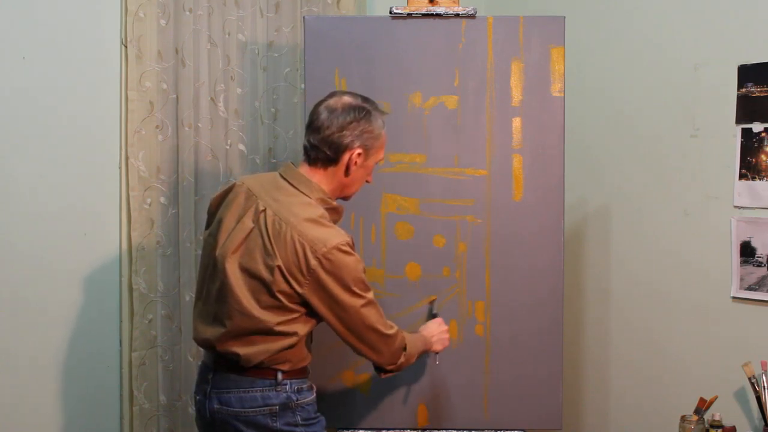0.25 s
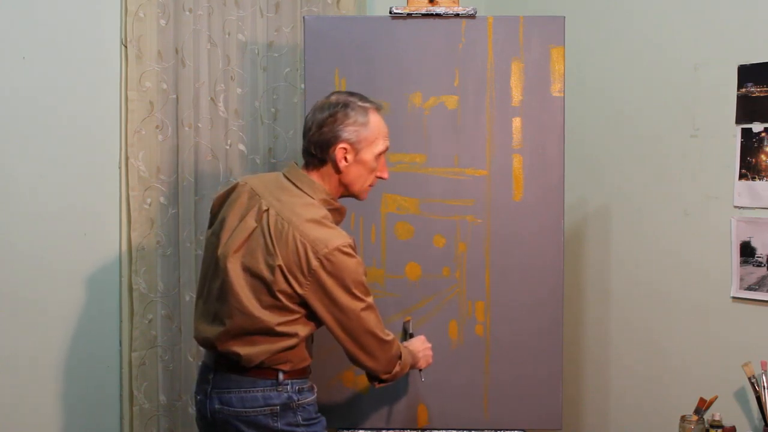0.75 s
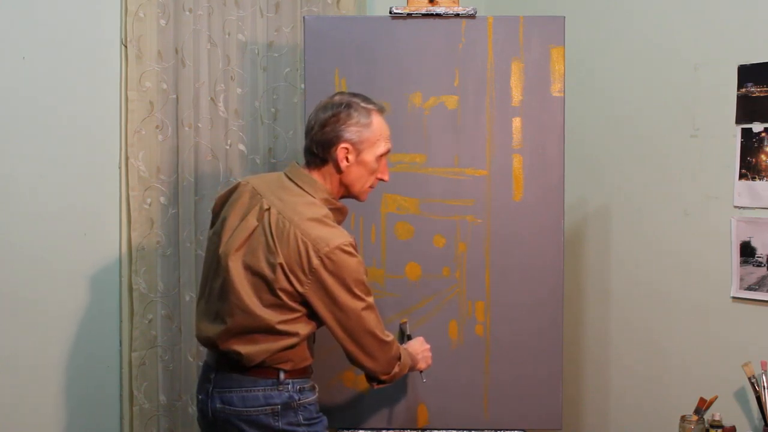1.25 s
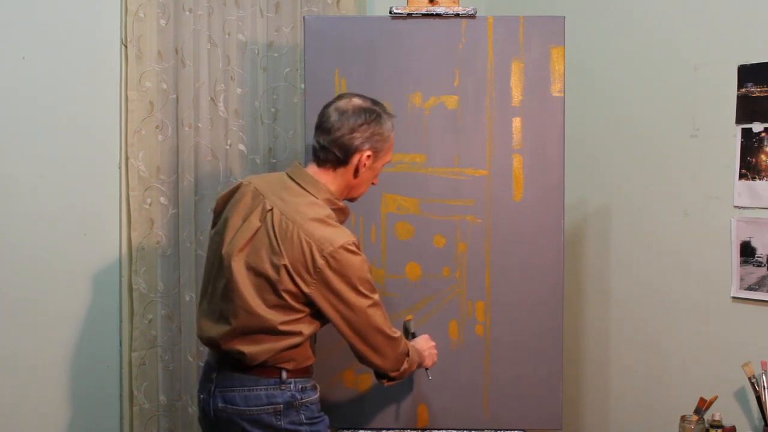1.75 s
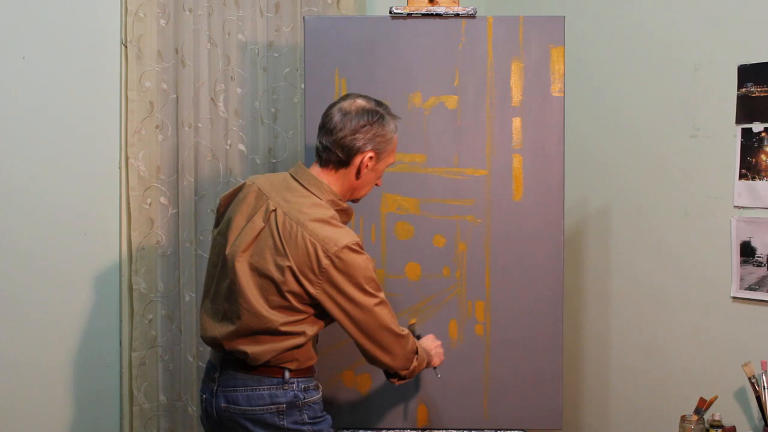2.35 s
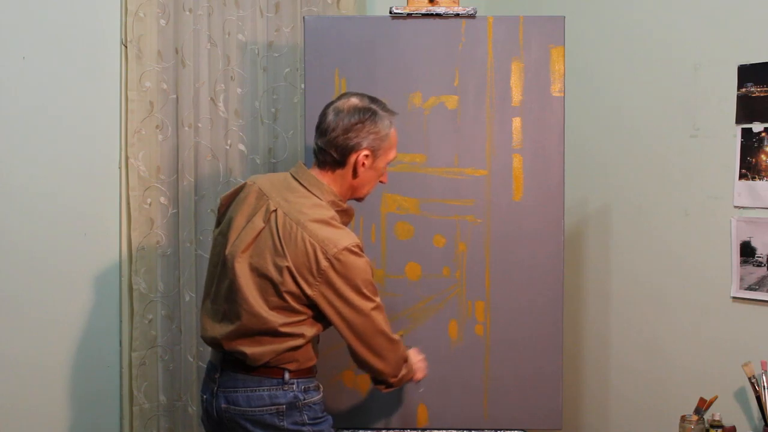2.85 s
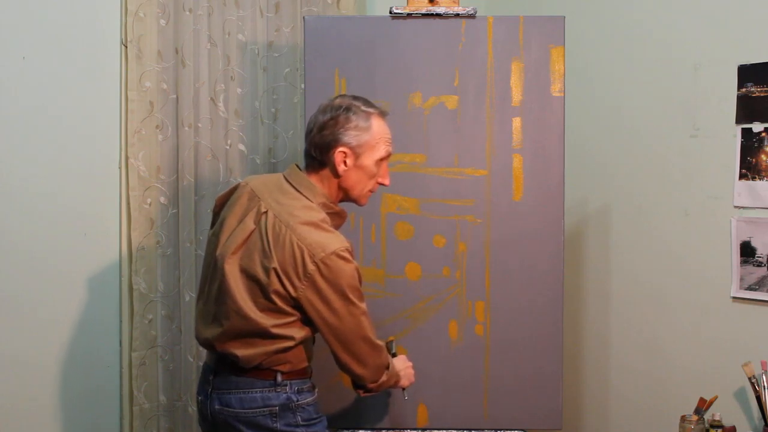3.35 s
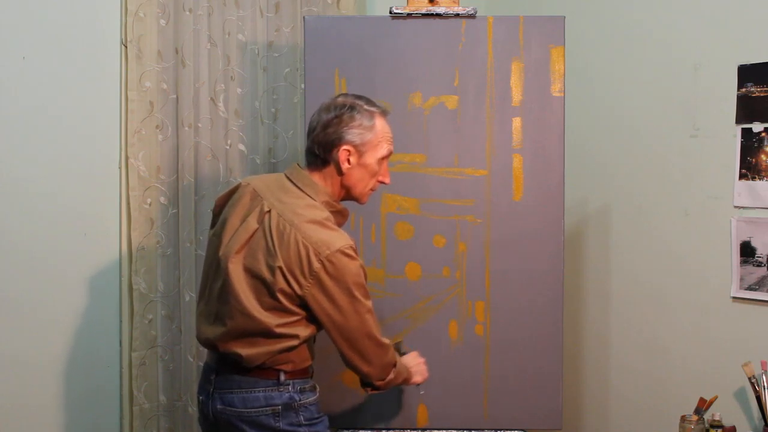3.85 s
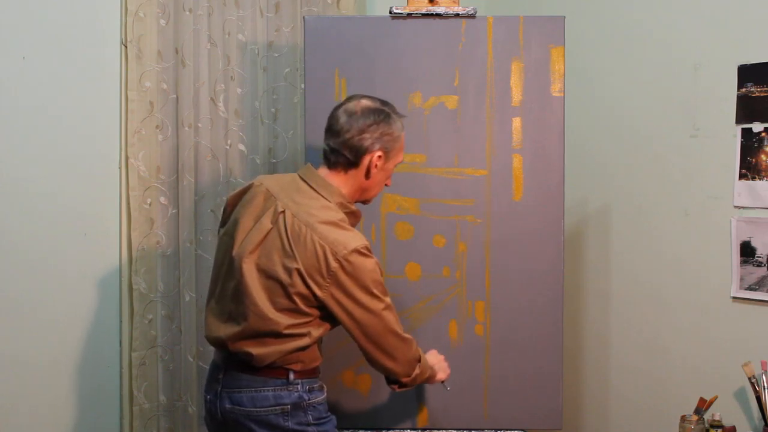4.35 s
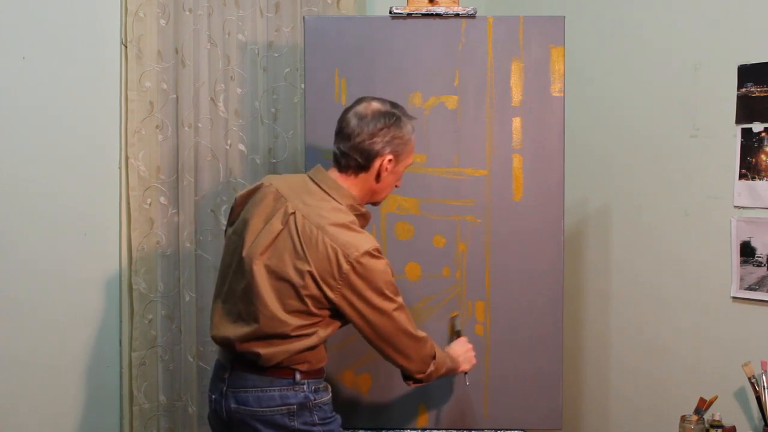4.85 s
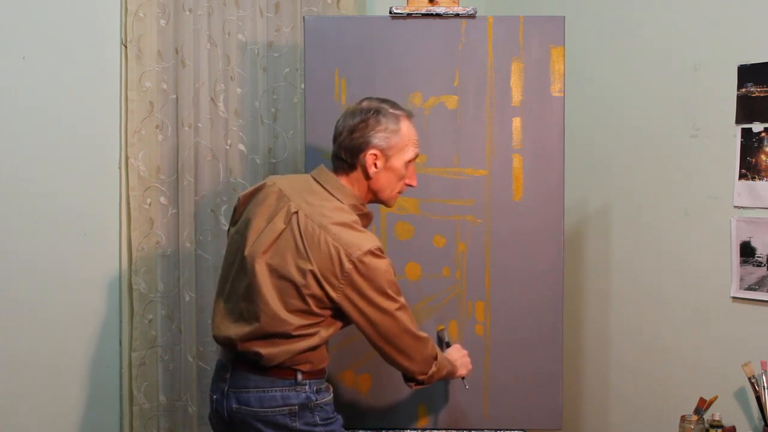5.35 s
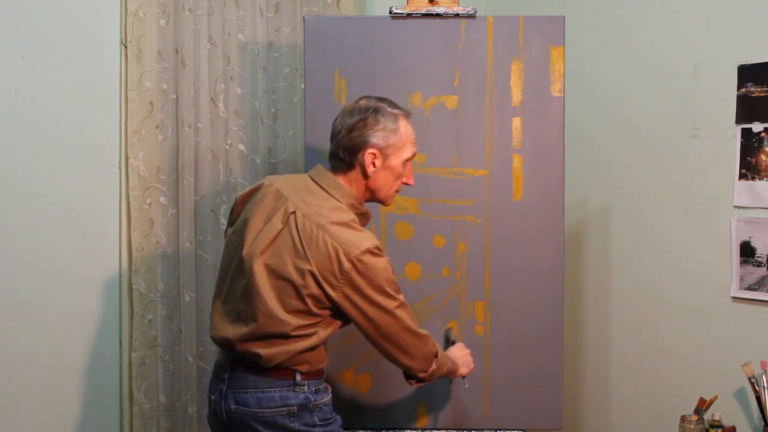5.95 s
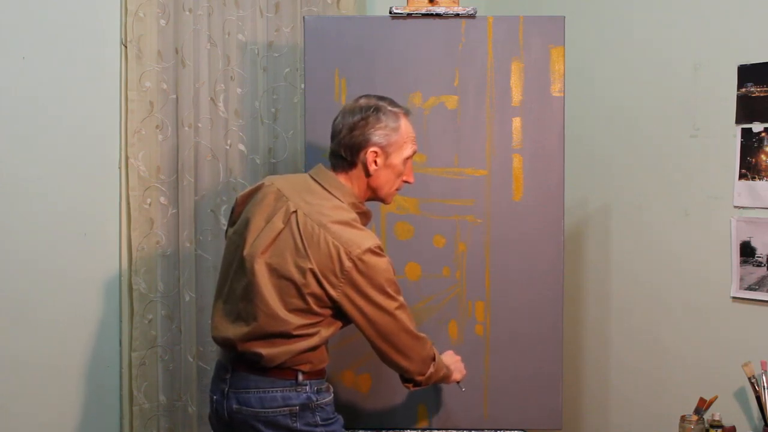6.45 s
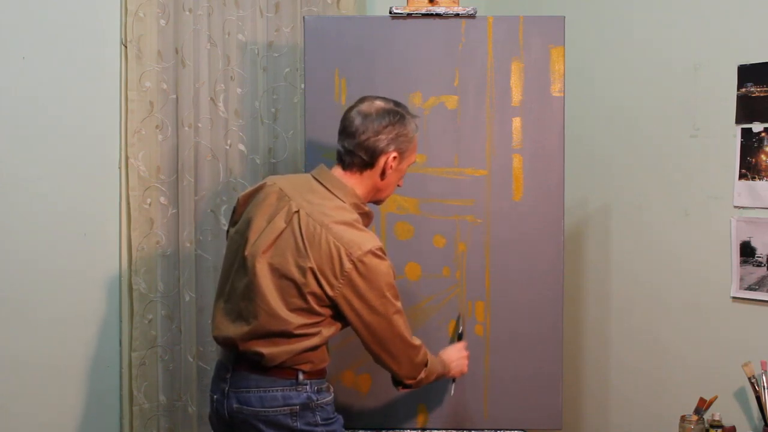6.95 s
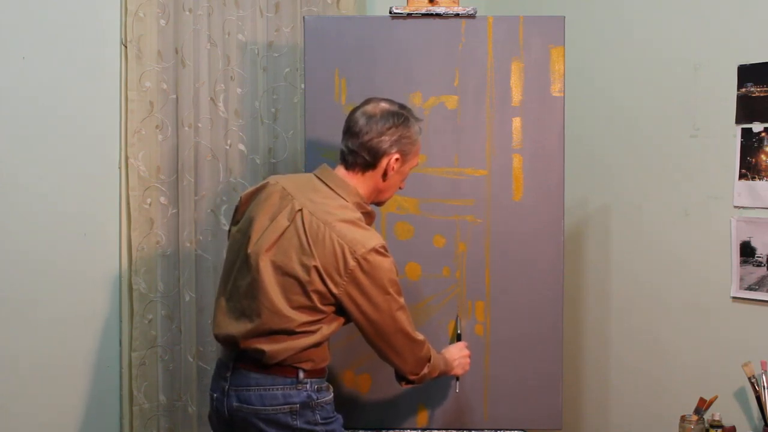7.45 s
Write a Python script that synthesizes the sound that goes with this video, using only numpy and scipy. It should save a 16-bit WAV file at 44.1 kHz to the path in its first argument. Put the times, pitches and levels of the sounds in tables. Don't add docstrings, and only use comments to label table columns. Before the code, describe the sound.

Quick bristle scrubs, bright and scratchy with a hollow papery thump from the taut cloth and frame, at roughly seven a second. Two short gaps break the rhythm and some strokes catch a faint squeaky ring. The close-walled room adds a short tail. Low appliance hum, soft traffic wash and an engine droning upward through the wall fill the background, heard from a couple of metres.

```python
import sys
import numpy as np
from scipy import signal
from scipy.fft import rfft, irfft
from scipy.io import wavfile
from scipy.ndimage import uniform_filter1d

SR = 44100
rng = np.random.default_rng(int(sys.argv[2]) if len(sys.argv) > 2 else 0)


def to_wav(s):
    ch = np.atleast_2d(s).T
    pcm = np.round(np.clip(ch, -1, 1) * 32767)
    wavfile.write(sys.argv[1], SR, pcm.astype(np.int16))


def gain_from_decibels(decibels):
    exponent = np.asarray(decibels, float) / 20
    return 10 ** exponent


N = 340026


def level(x, db):
    return x * gain_from_decibels(db) / np.sqrt(np.mean(x ** 2))


def curves(table):
    s, *columns = np.transpose(table)
    return [np.interp(np.arange(N) / SR, s, column) for column in columns]


def colour(x, points):
    hz, db = np.transpose(points)
    f = np.fft.rfftfreq(N, 1 / SR) + 1
    gain = gain_from_decibels(np.interp(np.log(f), np.log(hz), db))
    return irfft(rfft(x) * gain, N)


def ring(x, hz, width_hz):
    return signal.lfilter(*signal.iirpeak(hz, hz / width_hz, fs=SR), x)


def narrow_band(x, hz, width_hz, db):
    return level(ring(ring(x, hz, width_hz), hz, width_hz), db)


def walk(rate):
    hold = int(SR / rate)
    steps = np.repeat(rng.standard_normal(N // hold + 1), hold)
    return 1.3 * uniform_filter1d(uniform_filter1d(steps, hold), hold)[:N]


def hand():
    # peak in seconds, bristle hiss in dB,
    # fall in seconds, pressure into the canvas in dB.
    strokes = [(0.018, -49, 0.036, 0), (0.134, -49, 0.033, 2.5), (0.229, -44.5, 0.088, -2),
               (0.328, -48.2, 0.035, 2.5), (0.506, -43, 0.056, 1), (0.6, -54.5, 0.05, -3),
               (1.256, -58, 0.037, 1), (1.389, -47.5, 0.028, -2.5), (1.433, -46.0, 0.042, -0.5),
               (1.528, -49, 0.043, -0.5), (1.656, -44, 0.038, 1.5), (1.776, -45, 0.051, -1),
               (1.956, -40.5, 0.05, -1), (2.067, -43.2, 0.021, -0.5), (2.109, -43, 0.04, -0.5),
               (2.243, -43.5, 0.048, -1), (2.385, -44.5, 0.055, 0), (2.592, -39.5, 0.06, -2),
               (2.805, -40, 0.045, -2.5), (2.87, -43.5, 0.06, -2), (2.958, -48.5, 0.045, -5),
               (3.737, -56.5, 0.067, 0), (3.961, -48, 0.077, 2), (4.082, -46, 0.074, -2),
                      (4.141, -46.5, 0.046, 0), (4.309, -42.9, 0.06, 0), (4.47, -47.5, 0.04, 3),
                      (4.561, -41.5, 0.063, -0.5), (4.757, -43.5, 0.049, -3), (4.912, -43.5, 0.043, 0),
                      (5.033, -44, 0.048, -0.5), (5.187, -50.7, 0.055, -1), (5.333, -53.5, 0.042, 0.3),
                      (5.474, -50.5, 0.043, -1), (5.619, -50, 0.061, 1), (5.838, -46.3, 0.028, 1.5),
                      (5.89, -48.5, 0.047, 0.3), (6.099, -43.5, 0.053, -1), (6.39, -56.3, 0.041, 4),
                      (6.551, -49, 0.049, 3.5), (6.64, -46.0, 0.067, -1), (6.77, -67, 0.13, 6),
                      (7.182, -61, 0.044, 3), (7.313, -48, 0.04, 6.5), (7.46, -59, 0.06, 5),
                      (7.567, -54.7, 0.022, 5.5), (7.61, -53.5, 0.035, 5)]
    rise_share = 0.62
    resting_db = -66
    s, db, fall, press = np.array(strokes).T[:, :, None]
    since = np.arange(0, N + 64, 64) / SR - s
    span = fall * np.where(since < 0, rise_share, 1)
    power = gain_from_decibels(2 * db) / np.cosh(np.clip(since / span, -30, 30)) ** 2
    total = power.sum(axis=0) + gain_from_decibels(2 * resting_db)
    press_db = (power * press).sum(axis=0) / total
    return curves(np.transpose([since[0] + s[0], 10 * np.log10(total), press_db]))


def slips(per_s, scatter_db):
    hit = rng.random(N) < per_s / SR
    return hit * rng.standard_normal(N) * gain_from_decibels(scatter_db * rng.exponential(size=N))


def bristle_hiss(push, press_db):
    # frequency in Hz, density in dB per Hz.
    bristle_tone = [(2000, -50), (3000, -18.5), (4300, -12.5), (5300, -10), (6800, -7.5), (7900, -8.5),
                    (9000, -14.5), (10500, -22.5), (12400, -31.5), (14000, -38), (15500, -50)]
    muffle_hz, muffle_db = 7000, -0.32
    hiss = level(colour(push, bristle_tone), 0.15)
    high = signal.butter(2, muffle_hz, "high", fs=SR, output="sos")
    top = signal.sosfiltfilt(high, hiss)
    return hiss + (gain_from_decibels(muffle_db * press_db) - 1) * top


def body(x, points, patchy_db):
    return gain_from_decibels(patchy_db * walk(10)) * level(colour(x, points), 0)


def canvas(push, hiss_db, press_db):
    # frequency in Hz, density in dB per Hz.
    cloth_tone = [(700, -70), (1200, -27), (1750, 3), (2100, 5), (2700, 5.5), (3400, 1), (4400, -5),
                  (6000, -15), (9000, -80)]
    drum_tone = [(350, -66), (600, -17.5), (850, -4), (1100, 0), (1350, -2.5), (1600, -2.5), (1900, -15.5),
                 (2600, -26), (4500, -80)]
    frame_tone = [(110, -70), (190, -25), (290, 2), (400, 2), (550, 1.5), (700, -4), (880, -17.5),
                  (1250, -33), (2200, -80)]
    # dB re hiss at -50 dB, dB per dB of hiss, dB per dB of pressure.
    follow = dict(cloth=(-4, -0.23, .4), drum=(-5, -0.51, .9), frame=(-7.5, -0.65, 1.3))
    cloth_db, drum_db, frame_db = (
        db + speed * (hiss_db + 50) + weight * press_db for db, speed, weight in follow.values())
    cloth = gain_from_decibels(cloth_db) * body(push, cloth_tone, patchy_db=0.5)
    drum = gain_from_decibels(drum_db) * body(push, drum_tone, patchy_db=0.4)
    frame = gain_from_decibels(frame_db) * body(push, frame_tone, patchy_db=1.7)
    return cloth + drum + frame


def caught_rings(push):
    # frequency in Hz, width in Hz.
    resonances = dict(ferrule=(2877, 40), handle=(2690, 40), weave=(1735, 36), panel=(1545, 38),
                  skin=(1145, 60), strut=(532, 60))
    # centre in seconds, length in seconds, resonance, level in dB re hiss.
    catches = [(0.248, .1, "weave", -9), (.52, 0.13, "panel", -13), (1.665, .06, "skin", -16),
               (1.768, .06, "panel", -7), (1.963, .07, "panel", -12), (2.08, .08, "ferrule", -14),
               (2.27, .07, "ferrule", -11), (2.42, .06, "ferrule", -26), (2.62, 0.09, "ferrule", -9),
               (2.804, .05, "panel", -11), (2.87, 0.11, "skin", -13), (4.16, 0.14, "ferrule", -7.5),
               (4.347, 0.065, "weave", -9), (4.556, .08, "ferrule", -10), (5.646, 0.056, "handle", -5),
               (6.12, .05, "handle", -11), (7.3, 0.096, "strut", -1.5), (7.592, 0.032, "strut", 2)]
    t = np.arange(N) / SR
    rings = np.zeros(N)
    for s, length, name, db in catches:
        swell = np.exp(-((t - s) / (0.78 * length)) ** 2)
        rings += swell * narrow_band(push, *resonances[name], db - 0.5)
    return rings


def brush():
    hiss_db, press_db = hand()
    push = slips(per_s=24000, scatter_db=.6)
    push = push * gain_from_decibels(0.37 * walk(40))
    hiss = bristle_hiss(push, press_db)
    return gain_from_decibels(hiss_db) * (hiss + canvas(push, hiss_db, press_db) + caught_rings(push))


def room(x):
    t60_s, tail_db = .35, -10
    t = np.arange(int(.6 * SR)) / SR
    noise = rng.standard_normal(len(t))
    low = signal.lfilter([.35], [1, -.65], noise)
    tail = low * gain_from_decibels(-60 * t / t60_s) + (noise - low) * gain_from_decibels(-60 * t / (0.4 * t60_s))
    tail *= np.clip(t / 0.0046, 0, 1) / np.sqrt(np.sum(tail ** 2))
    return gain_from_decibels(-1.42) * (x + gain_from_decibels(tail_db) * signal.fftconvolve(x, tail)[:N])


def hum():
    # frequency in Hz, width in Hz, level in dB.
    drones = [(42.7, 16, -57), (117.8, 5.8, -64.5), (161, 16.5, -65.5), (233.7, 9.5, -67)]
    return sum(narrow_band(rng.standard_normal(N), hz, width_hz, db) for hz, width_hz, db in drones)


def street():
    # frequency in Hz, density in dB per Hz.
    street_tone = [(15, -31), (25, -1), (64, -8.5), (130, -3), (235, -6.5), (259, -10.5), (425, -17),
                   (614, -18.5), (678, -19), (1010, -15), (1110, -21), (1490, -20), (9000, -41.5),
                   (11700, -86), (19800, -120)]
    # time in seconds, level in dB.
    passing = [(0, -50), (1.2, -51), (2.4, -52), (3, -52), (4.2, -51), (4.8, -47), (6, -49), (6.5, -49.5),
               (7.71, -46.5)]
    rumble_share = 0.39
    traffic_db, = curves(passing)
    bed = level(colour(rng.standard_normal(N), street_tone), 0)
    low = signal.sosfiltfilt(signal.butter(2, 280, fs=SR, output="sos"), bed)
    rumble_db = -51.5 + rumble_share * (traffic_db + 50) + 1.0 * walk(2.38)
    wash_db = traffic_db + 1.5 + 0.81 * walk(4)
    return low * gain_from_decibels(rumble_db) + (bed - low) * gain_from_decibels(wash_db)


def engine():
    # time in seconds, firing rate in Hz, load in dB.
    revs = [(2.45, 43.7, -17), (3.5, 45.34, -10.5), (4.5, 47.4, -9.5), (5.1, 48.5, -2), (5.5, 49.15, 0.5),
            (6.15, 49.92, -4), (6.74, 50.94, 0), (6.86, 50.87, -13.5), (7.71, 51, -25)]
    # level in dB at full load, dB per dB of load.
    orders = [(-54.5, .4), (-53.5, 0.42), (-52, 0.65), (-67, .1), (-66, 0.35)]
    # frequency in Hz, width in Hz, lift in dB.
    wall_modes = [(96, 6, 4.5), (149.5, 10.4, 6.5), (203.3, 6.4, 11), (245.3, 12, 6.5)]

    def wall_db(f):
        return sum(db / (1 + (2 * (f - mode) / width) ** 2) for mode, width, db in wall_modes)

    hz, load_db = curves(revs)
    fade_in = np.clip((np.arange(N) / SR - revs[0][0] + .15) / .2, 0, 1)
    phase = 2 * np.pi * np.cumsum(hz * (1 + .003 * walk(12))) / SR
    sound = np.zeros(N)
    for k, (db, share) in enumerate(orders):
        order_db = db + share * load_db + wall_db((k + 1) * hz) + 0.36 * walk(8.1)
        sound += np.sqrt(2) * gain_from_decibels(order_db) * np.sin((k + 1) * phase + k)
    return fade_in * sound


def scene():
    mono = room(brush()) + hum() + street() + engine()
    return np.array([mono, mono])


def band_limit(x):
    return signal.sosfilt(signal.butter(12, 15610, fs=SR, output="sos"), x)


def record(dry):
    # frequency in Hz, density in dB per Hz.
    mic_tone = [(1500, -16), (4000, -2), (7500, -5), (10000, -7), (12500, -11), (15500, -17)]
    hiss = level(colour(rng.standard_normal(N), mic_tone), -68.5)
    low_cut = signal.butter(4, 36, "high", fs=SR, output="sos")
    mix = signal.sosfilt(low_cut, dry + hiss)
    return band_limit(mix)


dry = scene()
out = record(dry)
to_wav(out)
```